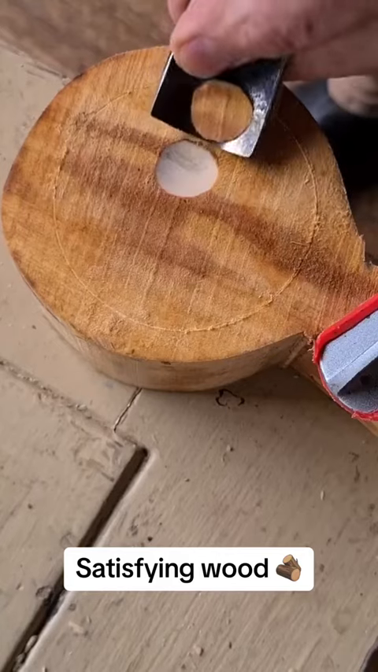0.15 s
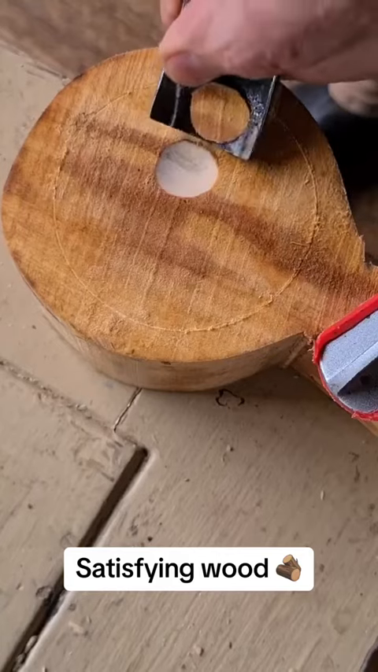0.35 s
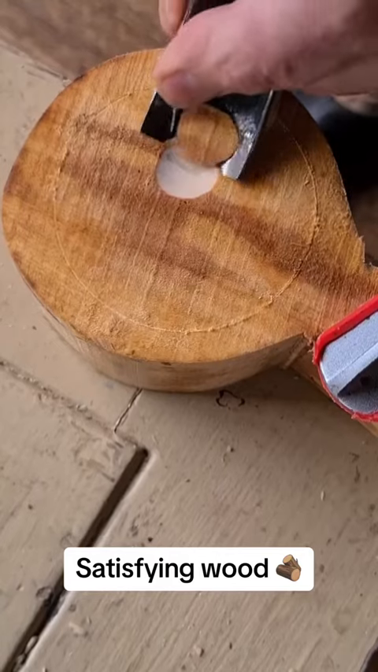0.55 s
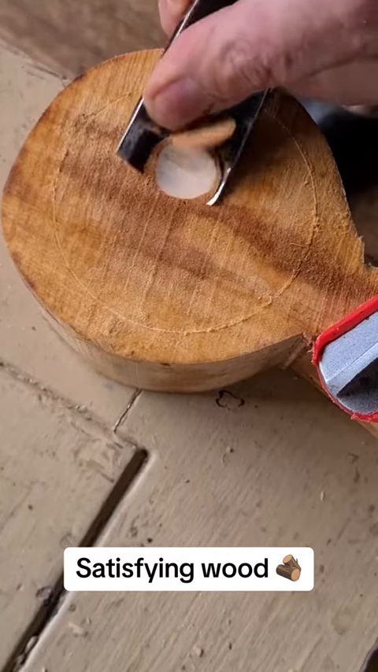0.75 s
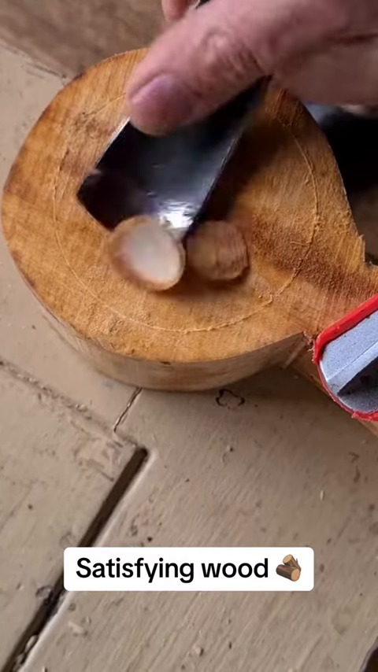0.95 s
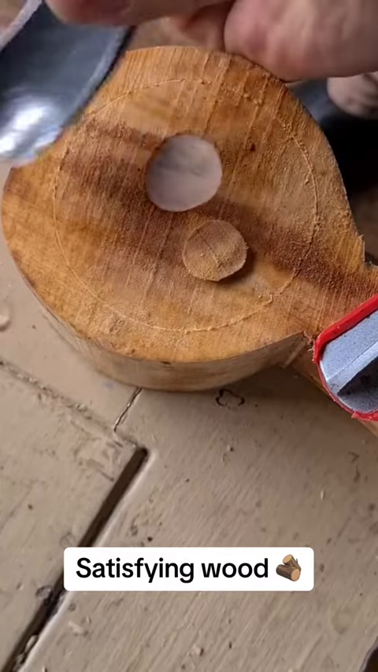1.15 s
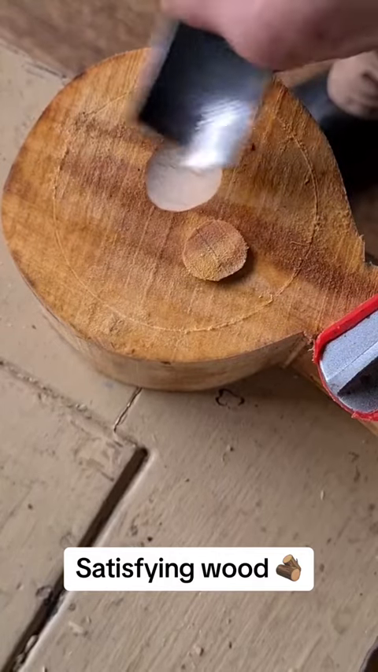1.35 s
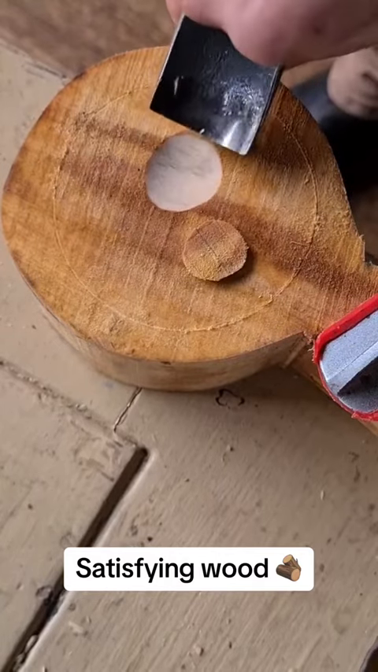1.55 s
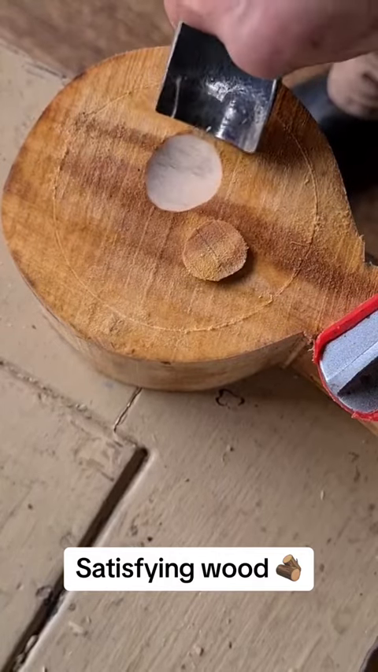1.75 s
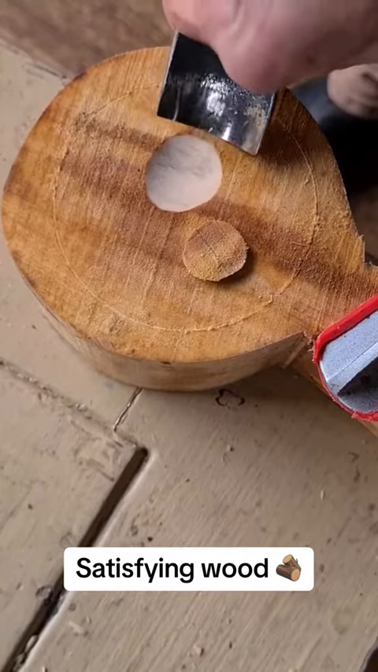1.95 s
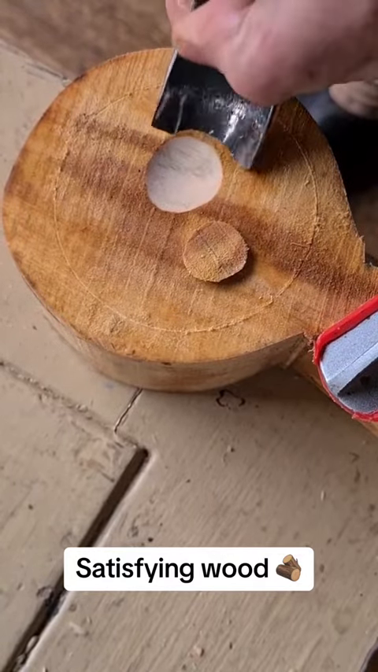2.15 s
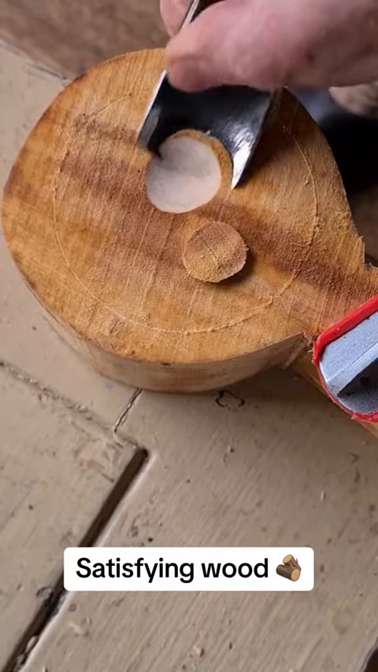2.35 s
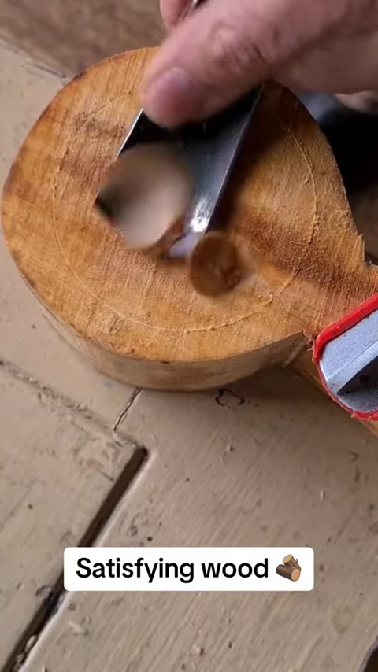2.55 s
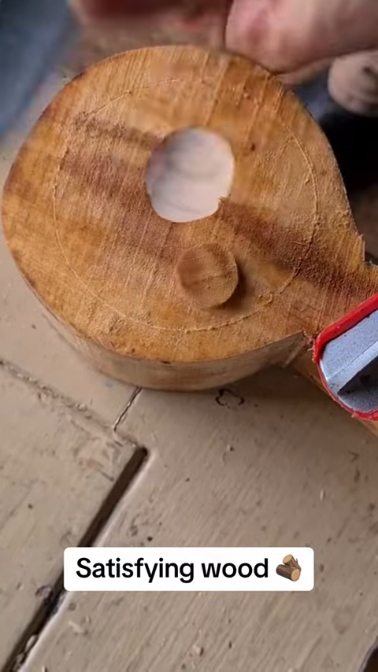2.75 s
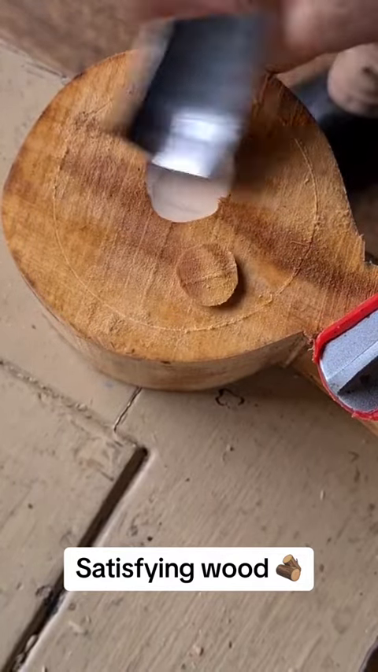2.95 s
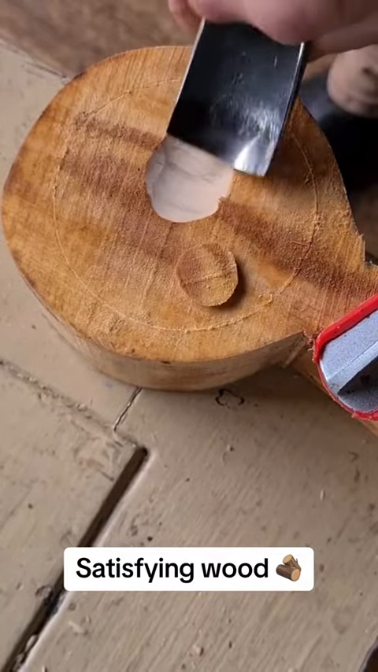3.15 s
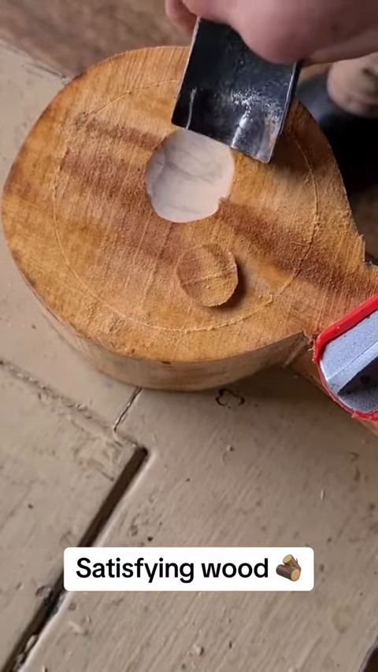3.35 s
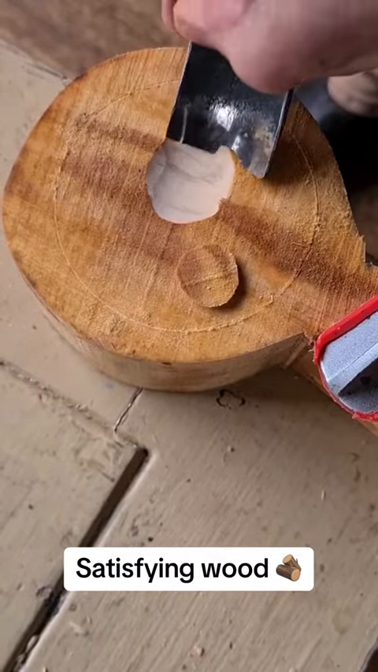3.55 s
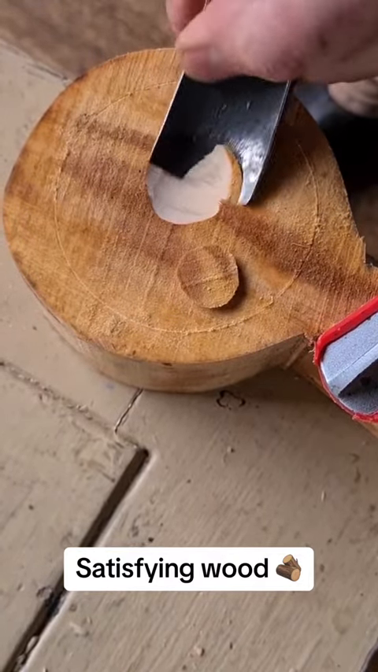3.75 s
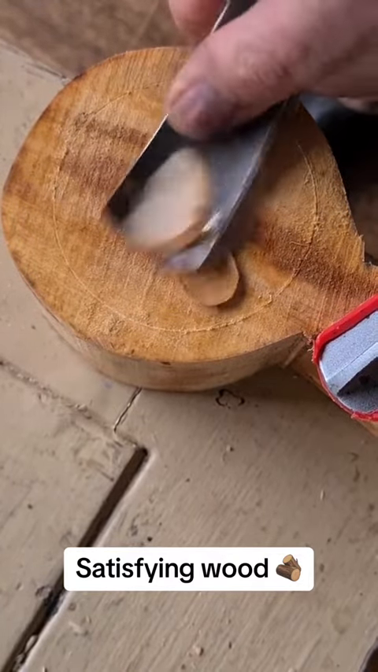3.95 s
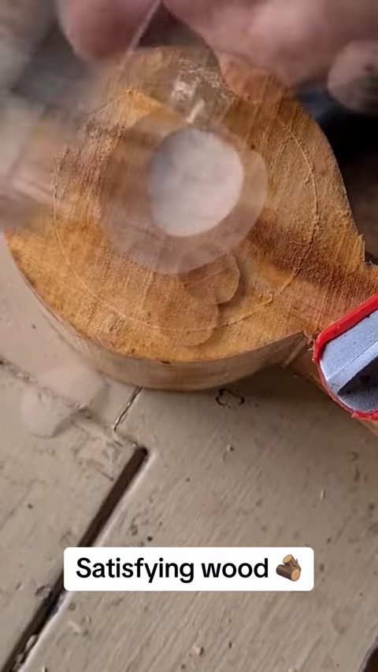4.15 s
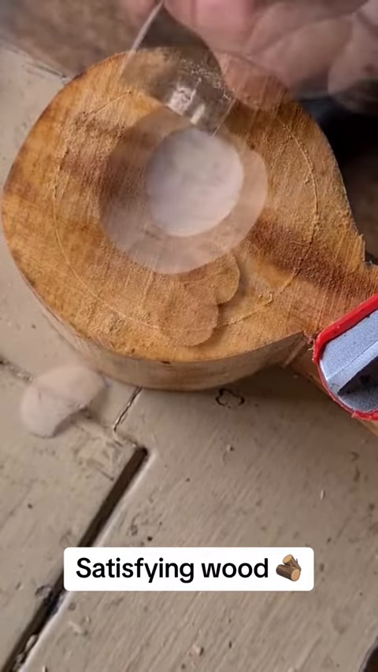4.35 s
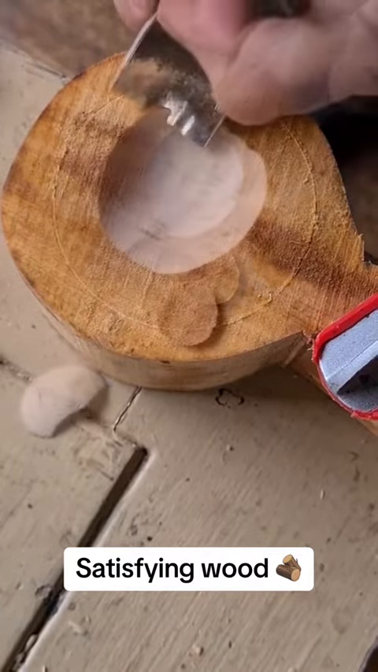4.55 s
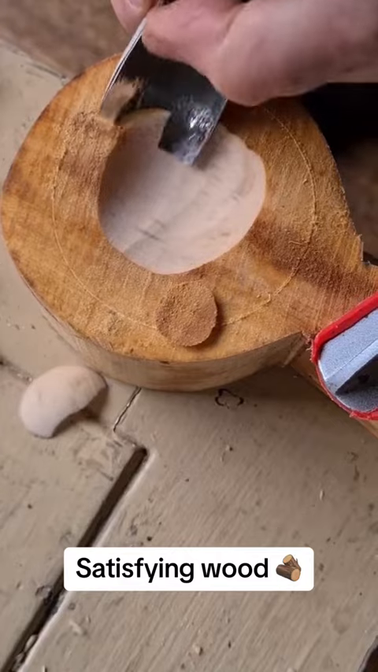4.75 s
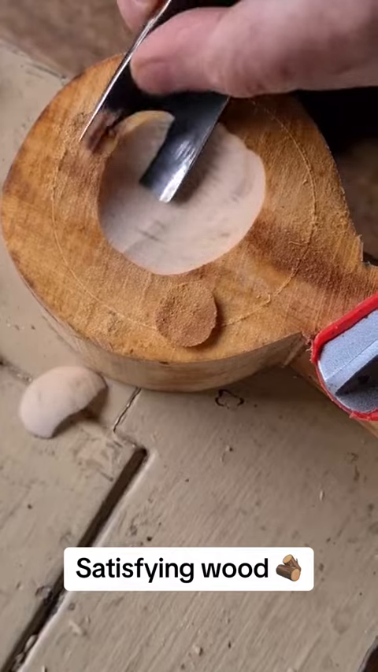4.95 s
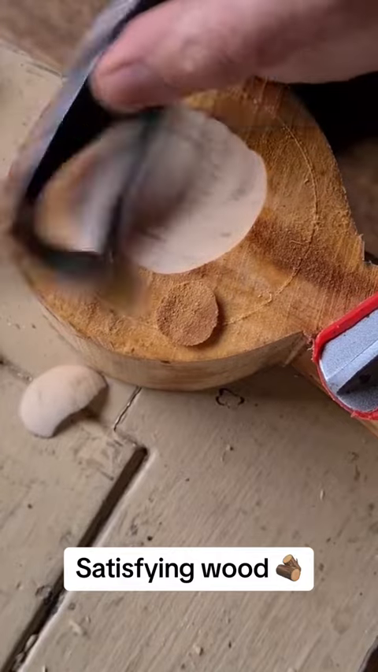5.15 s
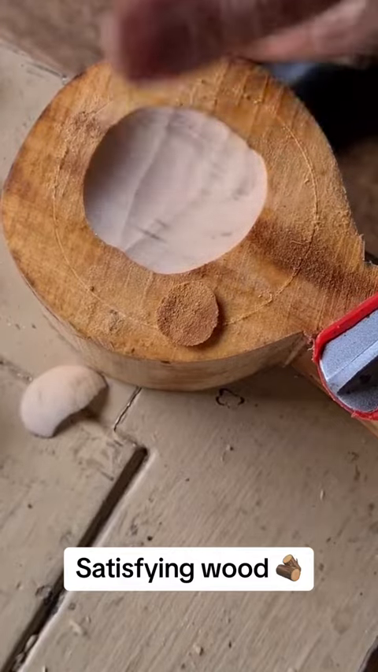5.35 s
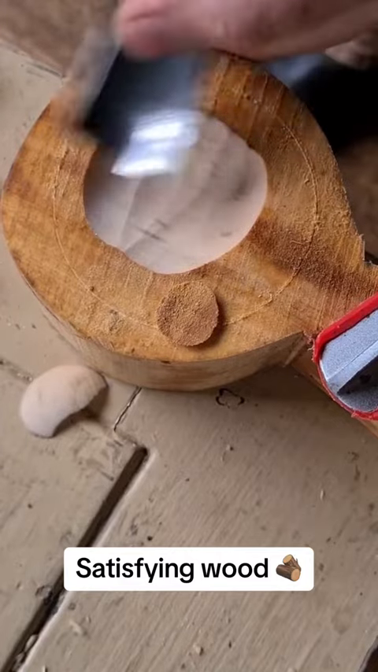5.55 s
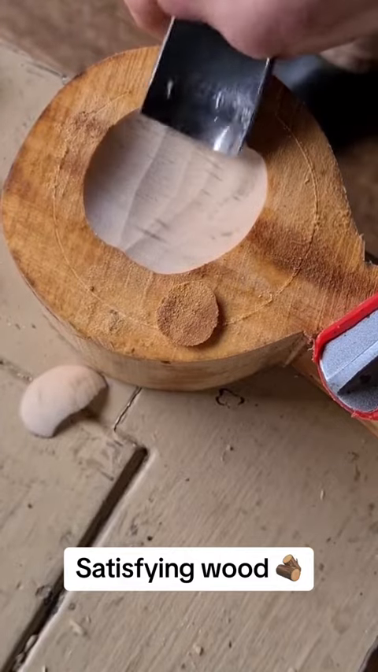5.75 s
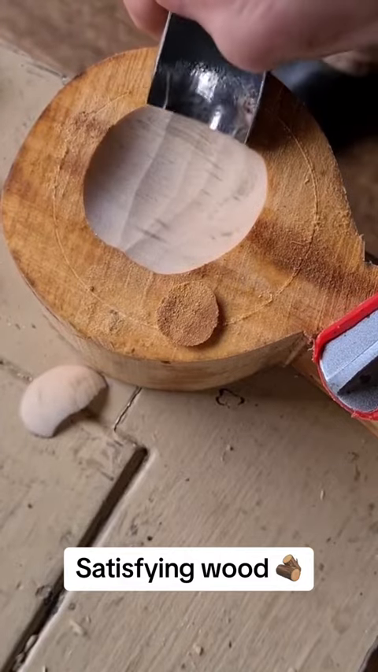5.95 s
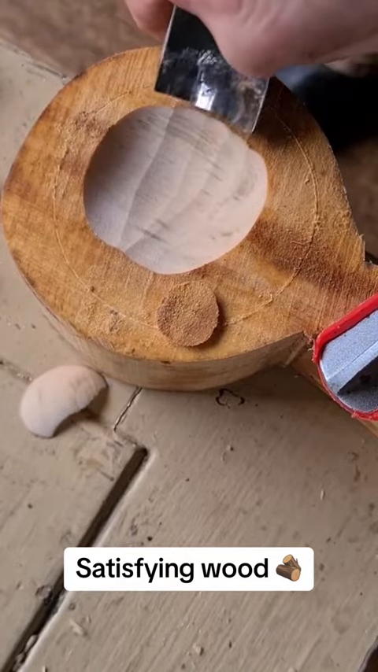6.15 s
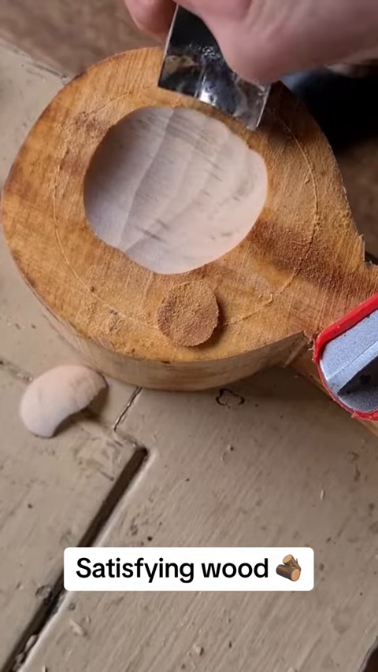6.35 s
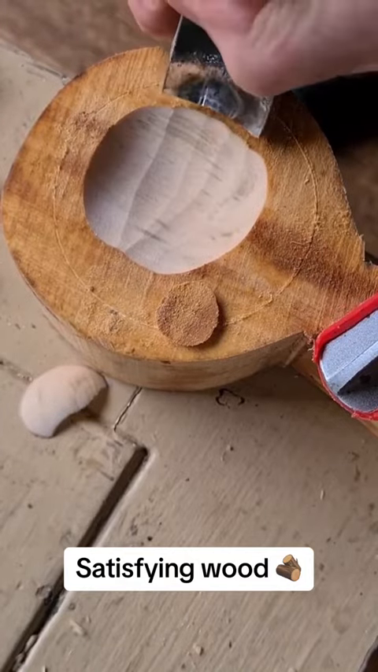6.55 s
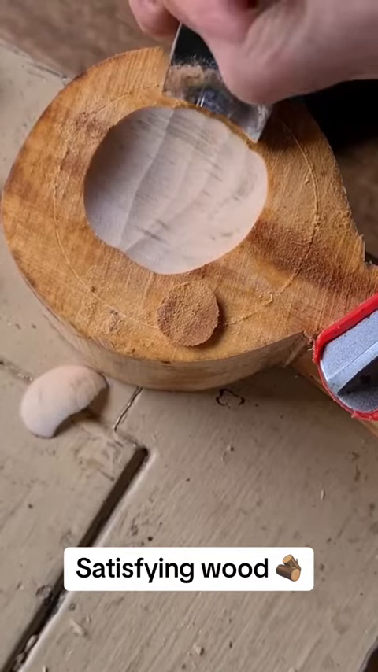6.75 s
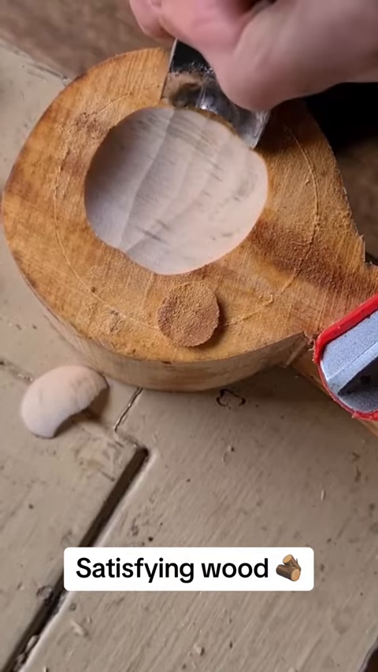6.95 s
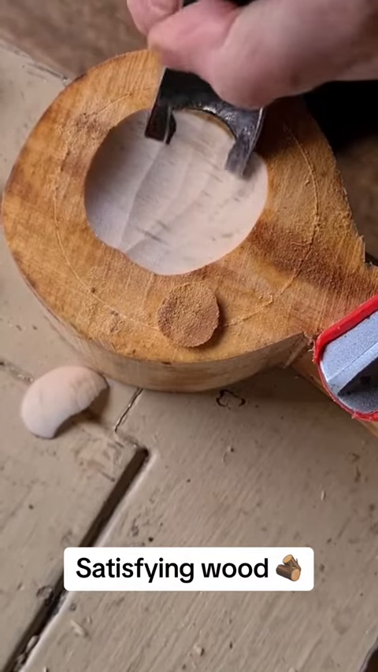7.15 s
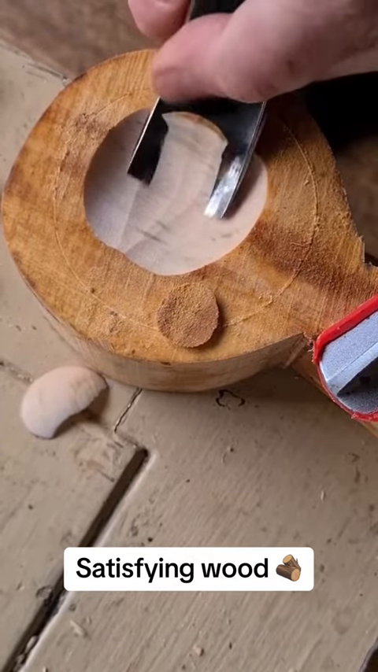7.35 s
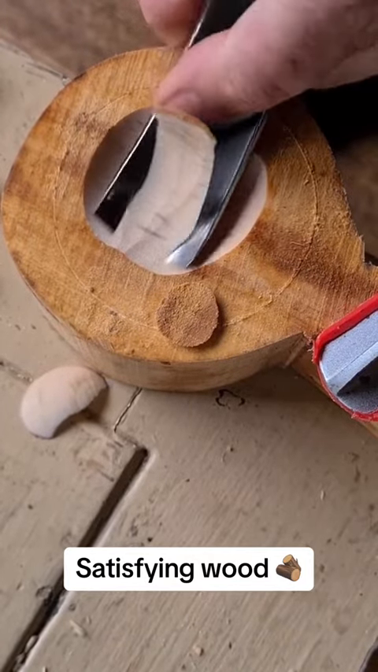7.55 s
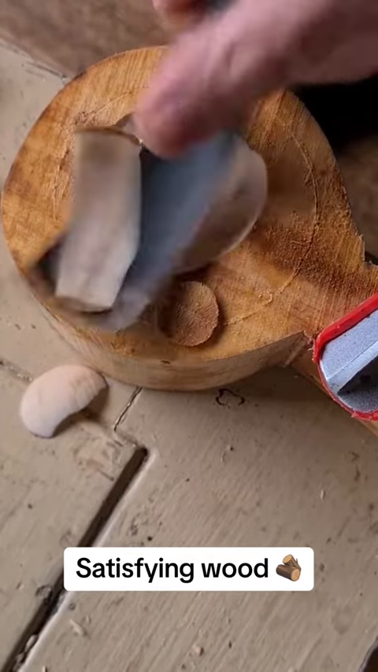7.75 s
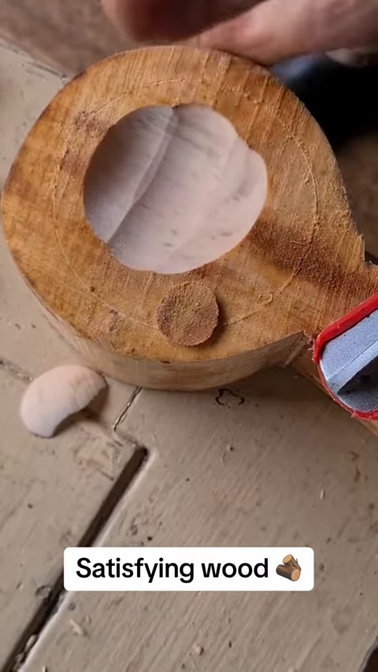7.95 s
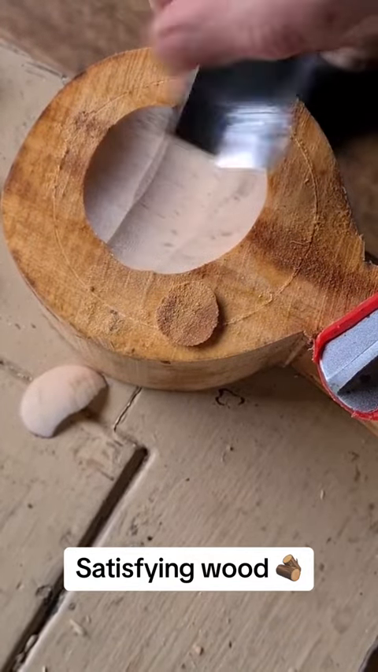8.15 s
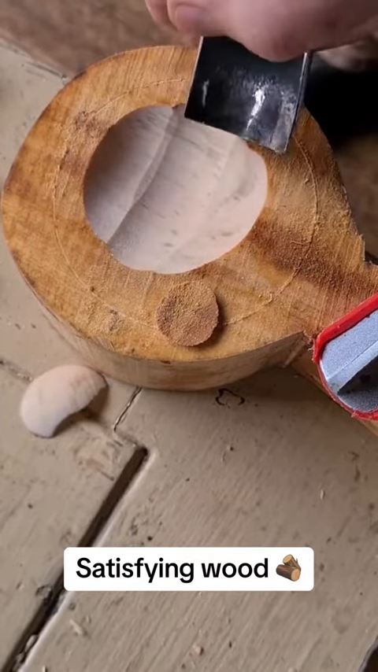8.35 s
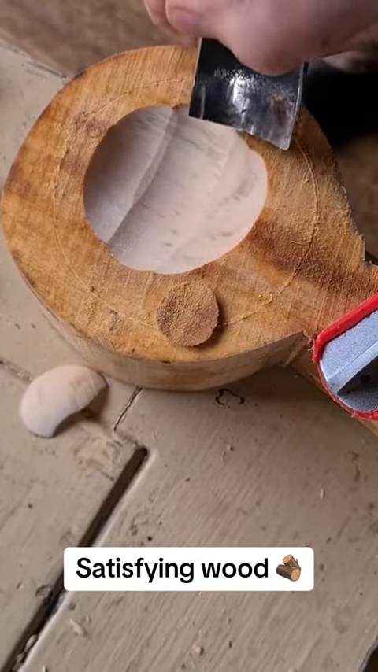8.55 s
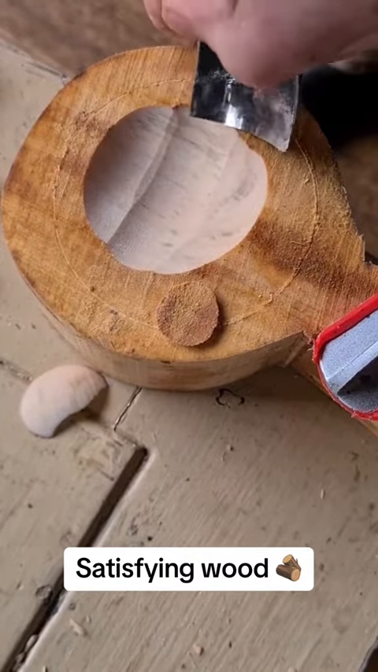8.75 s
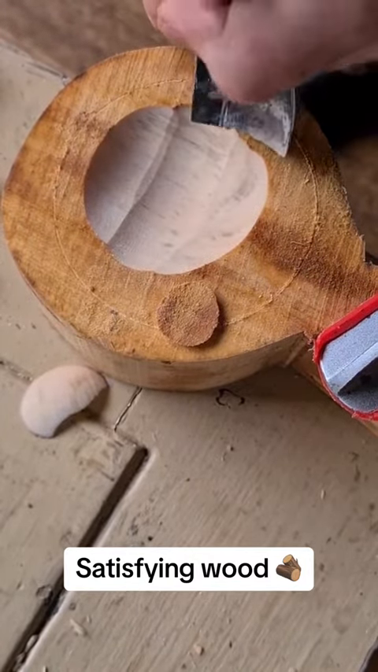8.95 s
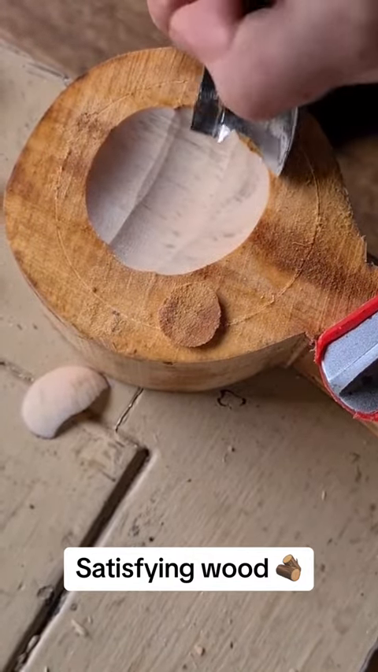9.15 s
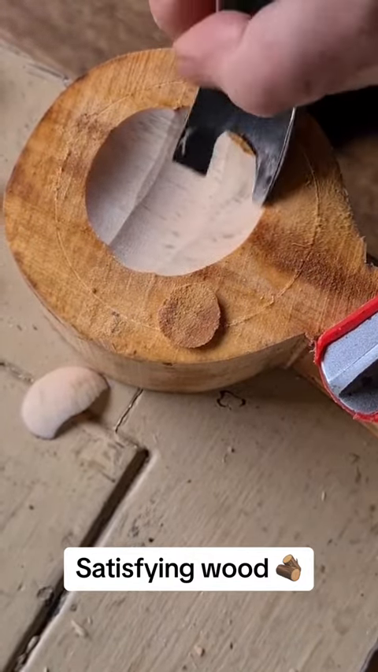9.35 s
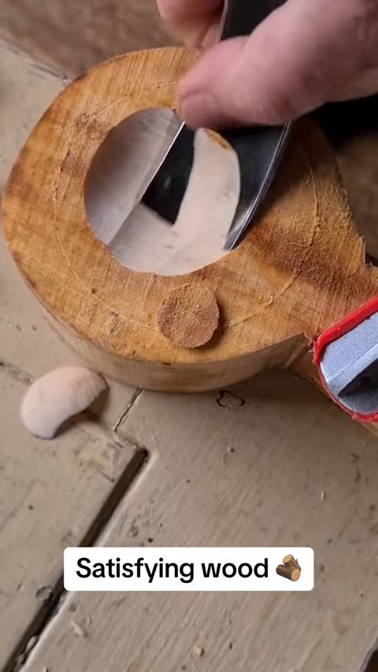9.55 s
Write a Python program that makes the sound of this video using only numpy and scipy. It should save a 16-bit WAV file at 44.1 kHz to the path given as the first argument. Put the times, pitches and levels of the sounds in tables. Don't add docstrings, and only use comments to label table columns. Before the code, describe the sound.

A hand gouge crunches through wood in six separate rasping pushes, with snapping fibres, sharp chip ticks and small bench knocks over faint hiss.

```python
import sys
import numpy as np
from scipy import signal
from scipy.fft import rfft, irfft
from scipy.io import wavfile
from scipy.ndimage import uniform_filter1d

SR = 44100
rng = np.random.default_rng(int(sys.argv[2]) if len(sys.argv) > 2 else 0)


def boost_factor(decibels):
    exponent = np.asarray(decibels, float) / 20
    return 10 ** exponent


def generate_wav(signal):
    frames = np.transpose(np.atleast_2d(signal))
    scaled = np.clip(frames, -1, 1) * 32767
    pcm = np.round(scaled).astype(np.int16)
    wavfile.write(sys.argv[1], SR, pcm)


N = 423801

# [f/Hz, level/dB]
AIR = [(15, -33.5), (25, -4), (71, 2), (128, -2), (318, -8), (879, -10), (1390, -7), (2240, -16),
       (3010, -12), (6040, -23), (8320, -33.5), (12400, -29.5), (15000, -37.5)]
# [f/Hz, likeness]
LIKENESS = [(60, 0.79), (240, 0.82), (950, 0.32), (3770, 0.12), (15000, 0.04)]
# [strongest t/s, rub level/dB, rustle level/dB, fade/(dB/s)]
HANDS = [(.1, -64.5, -64.5, 16), (.33, -73, -68, 60), (1.34, -69.5, -62.5, 29), (1.37, -65, -53, 197),
         (1.47, -73, -63, 110), (1.85, -78.5, -72, 15), (2.78, -90, -56.5, 299), (3.075, -67, -47, 250),
         (3.1, -70, -58.5, 42.5), (3.36, -77, -68, 90), (4.2, -85.5, -63, 43), (5.47, -72, -49, 300),
         (5.5, -61.5, -73, 200), (5.57, -83, -60.5, 46), (5.846, -49, -61, 200), (5.86, -65.5, -67.5, 13),
         (6.22, -67, -65.5, 49), (7.82, -65, -56, 195), (8.04, -64.5, -60, 51), (8.25, -60, -54.5, 80),
         (8.34, -66, -57, 202), (8.38, -72, -67, 42), (8.66, -68, -73, 5.5), (9.051, -75.5, -66.5, 39)]
# [f/Hz, width/Hz, level/dB]
SLEEVE = [(1148, 250, -2), (2230, 3400, -1.5), (3400, 1320, -2), (5500, 2420, -8.5), (7100, 2500, -10.5)]
# [t/s, peak level/dB, f/Hz, block level/dB]
KNOCKS = [(0.573, -39.5, 90, -35), (0.984, -29, 59.4, -1.5), (.985, -37, 540, -20), (1.057, -48, 171, -14),
          (1.963, -55.5, 95.5, -9), (2.115, -36, 92, -8), (2.41, -34.5, 80, -20), (2.698, -36.5, 248, -7.5),
          (2.779, -45, 101, -25), (3.442, -44, 177, -24.5), (3.478, -44.5, 101, -29),
          (3.774, -24, 79.3, -16), (4.089, -31, 165, -4.5), (5.24, -31, 152, 0), (5.293, -24.5, 142, 1.5),
          (5.31, -32, 199.4, -1.5), (5.329, -31.5, 191, -23), (5.402, -36, 234, -9), (5.846, -35.5, 100, 1),
          (5.845, -49, 1300, -30), (5.845, -55, 2600, -30), (5.896, -49, 166, -10),
          (6.161, -49.5, 285, -12), (7.005, -36.5, 73, -11.5), (7.087, -29.5, 66, -8.5),
          (7.17, -30, 75.4, -22), (7.218, -27.5, 79, -26), (7.245, -29.5, 83, -21), (7.739, -29.5, 107, -4),
          (8.033, -48.5, 364, -3), (8.234, -37, 666, -13), (8.664, -48, 405, -16.5),
          (8.886, -47.5, 81.5, -16), (9.15, -45, 80, -22), (9.201, -36, 78, -19), (9.261, -32, 79.4, -25)]
# [f/Hz, width/Hz, level/dB]
BENCH = [(51.7, 15, -5.5), (79.4, 13, 3.5), (108, 23, -2), (153.5, 25, 2.5), (220, 75, -4)]
# [f/Hz, width/Hz, level/dB]
BLOCK = [(303.6, 64.5, 3.5), (407.8, 26, -2), (476.7, 112, 0), (727, 60, 1), (910, 554, 0.5),
         (1284, 384, 1.5), (1876, 150, -5), (2310, 560, -7), (2760, 400, -14)]
# [f/Hz, width/Hz, level/dB]
BLADE = [(3195, 700, -2.5), (3844, 700, -4), (4645, 260, -5.5), (5570, 1200, -2.5), (6320, 520, -2.5),
         (6813, 250, -4), (7750, 530, -11.5)]
# [f/Hz, width/Hz, level/dB]
EDGE = [(8650, 1100, 1), (9400, 900, -18), (10600, 3900, 13), (12100, 520, 9), (13400, 520, -7),
        (14360, 1900, -6)]
# [t/s, tearing level/dB]
PUSHES = [
    [(0.575, -64), (0.58, -45), (0.608, -49), (0.7, -42), (0.712, -37.5), (0.76, -41.5), (0.86, -38.5),
     (0.965, -33), (0.99, -46)],
    [(2.112, -65), (2.12, -48), (2.166, -56), (2.28, -46.5), (2.422, -46), (2.486, -36.5), (2.584, -35.5),
     (2.66, -36), (2.7, -45)],
    [(3.772, -47), (3.778, -34), (3.792, -39.5), (3.978, -35.5), (4.036, -29.5), (4.07, -31), (4.09, -47.5)],
    [(4.6, -62.5), (4.63, -48), (4.8, -37.5), (4.88, -42), (4.96, -32), (5.03, -37.5), (5.088, -29),
     (5.198, -27), (5.24, -43)],
    [(7.186, -49), (7.22, -43), (7.314, -43), (7.354, -31), (7.43, -36.5), (7.48, -36), (7.56, -32),
     (7.718, -28.5), (7.74, -47)],
    [(9.0, -74), (9.234, -47), (9.254, -38.5), (9.34, -41), (9.396, -32.5), (9.444, -38.5), (9.534, -31),
     (9.592, -36), (9.61, -38.5)],
]
# [t/s, tearing level/dB]
FEELS = [
    [(3.612, -64.5), (3.622, -51.5), (3.656, -44), (3.726, -45), (3.76, -58.5), (3.765, -56)],
    [(6.82, -68), (6.838, -56), (6.86, -59), (6.9, -56), (6.994, -62.5), (7.008, -46), (7.042, -57),
     (7.075, -57), (7.1, -62), (7.113, -64.5)],
    [(7.114, -58), (7.124, -41), (7.135, -34), (7.152, -27), (7.166, -33), (7.186, -46.5)],
]
# [half sunk t/s, depth 0-1, bench level/dB, blade level/dB, edge level/dB]
SINKS = [(.9, .7, -0.5, 0, 3.5), (2.601, 1.1, -1, 0, 1.5), (4.0, .9, -3, -1, 0.5), (5.11, .7, 0, -3, -3.5),
         (7.49, .9, 2.5, 0.5, 0), (9.57, .7, -1.5, 0, -1.5), (3.9, .1, -3, -0.5, -5), (7.2, .1, -2, -3, -6),
         (7.3, .1, 0, 1.5, -1.5)]
# (t/s, half length/s, level/dB)
SPLIT = (3.1, .012, 9.8)
# [from t/s, to t/s, f/Hz, level/dB]
ACCENTS = [(0.617, 0.784, 3700, 6.5), (0.576, 0.72, 1970, 6), (0.905, .99, 2720, -1), (.9, .99, 4100, -4.5),
           (2.13, 2.45, 2320, -0.5), (2.5, 2.7, 6650, 4), (2.504, 2.7, 11400, 5.5), (2.64, 2.72, 2740, -7),
           (3.62, 3.76, 6200, 3), (3.8, 4.0, 790, -0.5), (3.953, 4.09, 4430, -5.5), (4.62, 4.896, 1900, 3),
           (4.62, 4.9, 2420, -1.5), (4.7, 5.05, 3400, 3), (4.66, 4.9, 5000, -3), (5.03, 5.2, 2830, -6.5),
           (5.03, 5.233, 6130, 2.5), (5.05, 5.17, 4420, -18), (5.047, 5.23, 3250, 4), (5.052, 5.224, 2340, 3),
           (5.054, 5.23, 1610, -2), (5.06, 5.162, 8340, -3), (6.87, 7.0, 3700, 3), (7.0, 7.18, 2120, 5),
           (7.13, 7.159, 3650, 5), (7.12, 7.43, 1840, 3), (7.2, 7.444, 3500, -1), (7.486, 7.724, 4880, 6),
           (7.486, 7.724, 5500, 3), (7.48, 7.73, 1560, 5), (7.5, 7.725, 1070, -2), (7.49, 7.73, 3740, 2),
           (7.528, 7.618, 4100, -3), (7.55, 7.7, 8700, -10), (7.556, 7.73, 2730, -4.5),
           (9.1, 9.35, 2070, 7.5), (9.236, 9.61, 1450, 2.5), (5.12, 5.24, 560, 2), (4.9, 5.1, 560, -3),
           (3.95, 4.09, 1100, 3), (2.45, 2.7, 8500, -5)]
# [t/s, peak level/dB, dull level/dB, left-right level/dB]
SNAPS = [(0.754, -38, -10, -2), (2.2294, -48, 2, -3), (2.3773, -44, -5, -4), (3.6375, -44, -11, -3),
         (3.7853, -37, -6, -3), (3.7912, -34, -11, -5), (3.849, -34, -11, -4), (4.7528, -38, -7, -1),
         (7.1466, -22, -11, -4), (7.2974, -40, -4, -4), (7.639, -22, -18, -5), (9.1361, -54, -9, -1),
         (9.284, -34, -15, -3)]
# [t/s, peak level/dB, dull level/dB, left-right level/dB]
POPS = [(.947, -24, 36, -2), (.958, -26, 36, -2), (.974, -25, 36, -2), (4.032, -21, 36, -2),
        (4.058, -21, 36, -2.5), (5.142, -17, 36, -2), (5.163, -22, 36, -1), (5.1895, -19, 36, -2),
        (9.401, -27, 36, -2), (9.523, -25, 36, -2), (9.573, -25, 36, -2)]
# [t/s, peak level/dB, dull level/dB, left-right level/dB]
CHIPS = [(1.072, -30.5, -22, -5), (1.351, -27, 4.5, -2), (1.435, -26, -13, -8), (2.119, -47, -4, -2),
         (2.629, -28, -22, 5), (2.6345, -15, -25, 2), (2.6372, -4.5, -35, -1), (2.6555, -21.5, -17, -8.5),
         (3.0595, -12.5, -11, -2), (3.062, -14.5, -1.5, 4), (3.065, -25, 2, -4), (5.449, -29, 4, -5),
         (5.452, -28, 0, -2), (5.456, -28, -5, 5), (5.461, -25, -3, -2), (5.639, -39.5, -4, -12),
         (7.9345, -36.5, 12, -4)]
# [t/s, peak level/dB, dull level/dB, left-right level/dB]
TAPS = [(1.352, -36, -17, -6), (1.443, -41, 7, -4), (3.192, -28.5, 16.5, -3), (3.317, -47.5, 29, -3.5),
        (3.386, -47, 12, -2), (5.442, -35.5, 14, -4), (5.459, -24, -5, 1), (5.57, -43, 13, -3),
        (5.576, -34, 6, -7), (5.596, -52, 5, -3), (5.669, -50, 5, -3), (5.727, -41.5, 8, -8.5),
        (5.843, -43, 29.5, 0), (6.838, -49, 3, -2), (7.006, -39.5, 6, -2), (7.009, -43, 3, -1),
        (7.071, -38.5, 13, 3), (7.087, -34, 0, -2), (7.089, -34.5, 14, -1), (7.092, -44, 4, -1),
        (7.6665, -11, -17, -4), (7.87, -35, -33, -5), (8.234, -22, 28, 0), (8.235, -24, -5.5, -6),
        (8.246, -23.5, 20, -3), (8.2465, -27, -5.5, -5), (8.339, -45, -1, -3)]
# [t/s, peak level/dB, f/Hz, cycles to fade 20 dB]
THUMPS = [(3.779, -26, 95, 4), (5.186, -25, 150, 12), (5.855, -39, 110, 3), (5.889, -44, 200, 6),
          (5.995, -57, 430, 14), (5.2445, -24, 150, 6), (5.291, -25, 280, 2.5), (5.298, -17, 250, 3),
          (5.3045, -21, 230, 4), (5.3155, -22, 165, 6), (5.331, -25, 200, 4), (5.362, -32, 190, 7),
          (5.3965, -27, 230, 4), (5.843, -21, 230, 1.6)]
# [t/s, scrape/s, f/Hz, t60/s, level/dB]
STEEL = [
    (4.0, .09, 7062, .3, -50),
    (3.97, .1, 12576, .5, -56),
    (8.23, .02, 12576, .5, -78),
]
# [delay t/s, left level/dB, right level/dB]
NEAR = [(.00035, -24.5, -31), (.0009, -16.5, -14.5), (.0017, -11.5, -15), (.0031, -21.5, -11)]
# [f/Hz, t60/s]
DECAY = [(100, 0.62), (400, 0.39), (1500, 0.22), (5000, 0.23), (12000, 0.24)]
# [f/Hz, level/dB]
WET = [(100, -24), (500, -10.5), (2000, -4.5), (8000, -5.5)]
# [from t/s, to t/s, upper limit f/Hz]
TOPS = [(.86, .915, 16000), (.925, 1.005, 14700), (1.43, 1.445, 16400), (1.445, 1.47, 14600),
        (2.48, 2.75, 14500), (2.5, 2.59, 16200), (2.62, 2.68, 16500), (3.055, 3.1, 16300),
        (3.83, 3.9, 14400), (3.845, 3.885, 15700), (3.93, 3.98, 15300), (4.03, 4.1, 14500),
        (4.92, 4.995, 14500), (5.05, 5.26, 13800), (5.125, 5.16, 16200), (5.165, 5.235, 14700),
        (5.45, 5.475, 14500), (7.12, 7.16, 15000), (7.31, 7.34, 14300), (7.34, 7.39, 14900),
        (7.545, 7.575, 16000), (7.52, 7.66, 14700), (7.705, 7.76, 14700), (9.36, 9.47, 14500),
        (9.51, 9.58, 14700), (9.58, 9.61, 13700)]
# [from t/s, to t/s, f/Hz]
GAPS = [(3.78, 3.81, 5200), (3.9, 4.15, 2600), (4.62, 4.7, 4800), (4.71, 4.9, 4950), (4.72, 4.9, 10500),
        (5.07, 5.15, 2850), (5.07, 5.15, 4400), (5.06, 5.165, 8400), (5.07, 5.14, 10000),
        (7.19, 7.28, 5250), (7.17, 7.3, 10500), (7.25, 7.29, 4050), (7.41, 7.5, 2500), (7.5, 7.6, 2650),
        (7.6, 7.72, 2780), (7.53, 7.61, 4120), (7.68, 7.72, 4450), (7.55, 7.69, 8300), (7.53, 7.61, 9700),
        (9.25, 9.36, 5100), (9.24, 9.33, 10800), (9.45, 9.5, 9000)]
# (from t/s, to t/s, level/dB)
LEAN = (8.2, 8.42, -12)


def evened(x):
    return x / np.sqrt(np.mean(x ** 2) + 1e-20)


def read(points, hz):
    f, value = np.transpose(points)
    return np.interp(np.log(hz + 1), np.log(f + 1), value)


def add(mix, s, sound):
    part = mix[..., round(s * SR):][..., :sound.shape[-1]]
    part += sound[..., :part.shape[-1]]


def ring(x, hz, width):
    r = np.exp(-np.pi * width / SR)
    return 2 * signal.lfilter([1 - r], [1, -r * np.exp(2j * np.pi * hz / SR)], x).real


def resonate(x, hz, width):
    return ring(ring(x, hz, width), hz, width)


def body(x, modes, lean_db=lambda hz: 0):
    total, power = 0, 0
    for k, (hz, width, db) in enumerate(modes):
        gain = boost_factor(db + lean_db(hz))
        total = total + (-1) ** k * gain * evened(resonate(x, hz, 1.723 * width))
        power = power + gain ** 2
    return total / np.sqrt(power)


def fibres(per_s, spread_db):
    size = boost_factor(spread_db * np.minimum(rng.exponential(1, N), 4)) * rng.choice([-1., 1.], N)
    return evened(size * (rng.random(N) < per_s / SR))


def air():
    frames, hz = N // 256 + 5, np.fft.rfftfreq(1024, 1 / SR)
    a, b, c, d, patches = rng.standard_normal((frames, 513, 5)).T
    patches = evened(uniform_filter1d(uniform_filter1d(patches, 10, axis=0), 14, axis=1))
    same = np.clip(read(LIKENESS, hz), -1, 1)[:, None]
    left = a + 1j * b
    right = same * left + np.sqrt(1 - same ** 2) * (c + 1j * d)
    z = np.array([left, right]) * boost_factor(read(AIR, hz)[:, None] + 2 * patches)
    return boost_factor(-71) * evened(signal.istft(z, nperseg=1024, noverlap=768)[1][:, :N])


def hands():
    t = np.arange(0, N, 64) / SR
    s, rub_db, rustle_db, fade = np.transpose(HANDS)[..., None]
    away_db = fade * np.maximum(t - s, 2.4 * (s - t))
    rub, rustle = (np.repeat(boost_factor(db - away_db).max(axis=0), 64)[:N] for db in (rub_db, rustle_db))
    grains = fibres(3000, 2.1)
    return rub * body(grains, BLOCK[:3]) + rustle * body(grains, SLEEVE)


def knocks():
    out, t = np.zeros(N), np.arange(SR // 2) / SR
    rattle_t60 = 0.21
    rattles = rng.standard_normal((len(KNOCKS), len(t)))
    for (s, db, hz, wood_db), rattle in zip(KNOCKS, rattles):
        push = (t < .0012) * 0.48 + rattle * boost_factor(-60 * t / rattle_t60)
        thud = evened(resonate(push, hz, 0.41 * hz))
        thud += boost_factor(wood_db) * body(push, BENCH[3:] + BLOCK[:3])
        thud += boost_factor(wood_db - 17.0) * evened(resonate(push, 800, 900))
        add(out, s, boost_factor(db) * thud / abs(thud).max())
    return out


def controls():
    out, t = np.zeros((6, N)), np.arange(N) / SR
    out[0] = -120
    sink_s, bite_s = 0.018, 0.013
    for rows, (sunk, depth, *shares_db) in zip(PUSHES + FEELS, SINKS):
        s, db = np.transpose(rows)
        on = (t >= s[0]) & (t <= s[-1])
        u = t[on]
        out[0, on] = np.interp(u, s, db)
        out[1, on] = depth / (1 + np.exp((sunk - u) / sink_s))
        out[2, on] = np.exp((s[0] - u) / bite_s)
        out[3:, on] = np.array(shares_db)[:, None]
    return out


def patchy(x, patchy_db):
    hz, t, z = signal.stft(x, SR, nperseg=512)
    patches = rng.standard_normal((len(t), len(hz))).T
    patches = evened(uniform_filter1d(uniform_filter1d(patches, 3, axis=0), 16, axis=1))
    start, end, mode_hz, db = np.transpose(ACCENTS)[..., None]
    fade_s, wide_hz = .012, 220
    held = np.clip(np.minimum(t - start, end - t) / fade_s + .5, 0, 1)
    accent_db = (db * np.exp(-.5 * ((hz - mode_hz) / wide_hz) ** 2)).T @ held
    shade_db = patchy_db * patches * (hz > 600)[:, None]
    return signal.istft(z * boost_factor(shade_db + accent_db), SR, nperseg=512)[1][:N]


def gouge():
    effort_db, depth, bite, bench_db, blade_db, edge_db = controls()
    tearing = uniform_filter1d(boost_factor(effort_db), 130)
    over_db = np.maximum(effort_db + 40, -30)
    split_s, split_half_s, split_peak_db = SPLIT
    split_db = split_peak_db * np.exp(-((np.arange(N) / SR - split_s) / split_half_s) ** 2)
    shake = boost_factor(-4 + bench_db - 0.41 * over_db + 2.5 * depth)
    hiss = boost_factor(-8 + blade_db + 3.5 * depth + 6.5 * bite + split_db)
    fizz = boost_factor(-24 + edge_db + 0.39 * over_db + 6.5 * depth - 5 * bite + split_db)
    slips = boost_factor(.7 * evened(uniform_filter1d(rng.standard_normal(N), 500)))
    coarse = fibres(3000, 3) * slips
    fine = fibres(6000, 2.4) * slips
    shallow_hz, deep_hz, bite_hz = 3750, 5454, 885
    blade_hz = shallow_hz + (deep_hz - shallow_hz) * depth + bite_hz * bite
    blade = body(fine, BLADE, lambda hz: -(12 + 10 * depth) * abs(np.log2(hz / blade_hz)))
    drive = tearing * shake
    low = body(drive * coarse, BENCH) * np.sqrt(np.mean(drive ** 2))
    high = body(coarse, BLOCK) + hiss * blade + fizz * body(fine, EDGE)
    return low + tearing * patchy(high, 2.9)


def chips(rows, bright_db):
    out, t, f = np.zeros((2, N)), np.arange(2048) / SR - .004, np.fft.rfftfreq(2048, 1 / SR) + 1
    thin_hz, thick_hz, thick_db = 6136, 3500, -2
    cracks = rng.standard_normal((len(rows), len(t)))
    for (s, db, dull_db, pan_db), crack in zip(rows, cracks):
        hz = thick_hz + (thin_hz - thick_hz) / (1 + boost_factor(4.3 * (dull_db - thick_db)))
        snap = np.clip(db + 45, 3, 25) * (abs(t) < .5 / SR)
        envelope = np.where(t < 0, np.exp(t / .0008), np.exp(-t / .0017))
        crack = (crack ** 3 + snap) * envelope
        # level/dB, f/Hz, width/octaves
        parts = ((0, hz, .25), (dull_db, 1100, .8), (bright_db, 12200, .35), (-4, 3200, .45),
                 (0.53 * bright_db - 4.0, 7200, .25), (dull_db - 13, 480, .6))
        colour = 0
        for g_db, at_hz, wide in parts:
            band = np.exp(-.5 * (np.log2(f / at_hz) / wide) ** 2)
            colour = colour + boost_factor(g_db) * band / np.sqrt(at_hz * wide)
        tick = irfft(rfft(crack) * colour)
        add(out, s - .0035, boost_factor(db) * tick / abs(tick).max() * boost_factor([[pan_db / 2], [-pan_db / 2]]))
    return out


def thumps():
    out, t = np.zeros(N), np.arange(SR // 8) / SR
    for s, db, hz, cycles in THUMPS:
        rise = np.minimum(t * hz / .7, 1)
        add(out, s, -boost_factor(db - 20 * t * hz / cycles) * rise * np.sin(2 * np.pi * hz * t))
    return out


def steel():
    out, t = np.zeros(N), np.arange(SR // 2) / SR
    for s, scrape, hz, t60, db in STEEL:
        sing = ring(rng.standard_normal(len(t)) * (t < scrape), hz, 2.2 / t60)
        add(out, s, boost_factor(db) * sing / abs(sing).max())
    return out


def bench_top(x):
    out = np.array([x, x])
    for s, left_db, right_db in NEAR:
        add(out, s, x * boost_factor([[left_db], [right_db]]) * [[1], [-1]])
    return out


def scatter(x):
    t = np.arange(600) / SR
    taps = rng.standard_normal((2, len(t))) ** 3 * np.exp(-t / .004) * (t > .0003)
    taps = taps / np.linalg.norm(taps, axis=1, keepdims=True)
    taps = signal.lfilter(*signal.butter(1, 3000, "high", fs=SR), taps)
    return boost_factor(-3.5) * signal.oaconvolve(x[None], taps, axes=1)[:, :N]


def shop(x):
    taps = np.zeros((2, SR))
    at = np.arange(400, SR - 20, 20)[:, None] + rng.integers(0, 20, ((SR - 401) // 20, 2))
    np.put_along_axis(taps, at.T, rng.choice([-1., 1.], at.T.shape), axis=1)
    hz, t, z = signal.stft(taps, SR, nperseg=512)
    z = z * boost_factor(-60 * t / read(DECAY, hz)[:, None])
    z = z / np.sqrt((abs(z) ** 2).sum(axis=2, keepdims=True)) * boost_factor(read(WET, hz))[:, None]
    tail = signal.istft(z, SR, nperseg=512)[1]
    tail *= boost_factor(WET[-1][1]) / np.linalg.norm(tail[0])
    return signal.fftconvolve(x[None], tail, axes=1)[:, :N]


def scene():
    work = gouge() + steel() + knocks() + thumps() + hands()
    ticks = chips(CHIPS, -6.5) + chips(SNAPS, -17) + chips(TAPS + POPS, -26)
    bass = ring(work, 0.32, 670) / 2
    near = (bass + bench_top(work - bass)) * boost_factor([[-1.6], [.6]])
    tick_mid = ticks.mean(axis=0)
    return near + ticks + scatter(work + tick_mid) + shop(work + boost_factor(-0.5) * tick_mid) + air()


def band_limit(x):
    return signal.sosfilt(signal.butter(12, 16650, fs=SR, output="sos"), x)


def record(dry):
    hz, t, z = signal.stft(dry, SR, nperseg=1024)
    power = uniform_filter1d((abs(z) ** 2).mean(axis=0), 6, axis=1)
    band_db = 10 * np.log10(uniform_filter1d(power, 4, axis=0) + 1e-20)
    around_db = uniform_filter1d(band_db, 40, axis=0)
    wander_db = 1.5 * np.repeat(rng.standard_normal(len(t) // 3 + 1), 3)[:len(t)]
    keep = np.where((hz > 1900)[:, None], band_db > around_db - 4.6 + wander_db, 1.)

    start, end, top_hz = np.transpose(TOPS)[..., None]
    limit_hz = np.maximum((top_hz * (t > start) * (t < end)).max(axis=0), 13200)
    keep *= hz[:, None] < limit_hz
    for start, end, gap_hz in GAPS:
        notch_db = -16 * np.exp(-.5 * ((hz - gap_hz) / 110) ** 2)
        keep[:, (t > start) & (t < end)] *= boost_factor(notch_db)[:, None]

    weak, under = (hz > 8300) & (hz < 10200), (hz > 5500) & (hz < 8000)
    weak_db, under_db = band_db[weak].mean(axis=0), band_db[under].mean(axis=0)
    keep[weak] *= np.clip((weak_db - under_db + 18 + np.maximum(under_db + 69, 0)) / 2, .25, 1)
    keep[np.ix_(weak, (t > LEAN[0]) & (t < LEAN[1]))] *= boost_factor(LEAN[2])

    now_db = 10 * np.log10((abs(z[:, hz > 2000]) ** 2).sum(axis=(0, 1)) + 1e-20)
    click = now_db - signal.medfilt(now_db, kernel_size=11) > 8
    beside = (np.convolve(click, np.ones(9))[2:len(t) + 2] > 0) & ~click
    blocks = np.kron(rng.random((len(t) // 2 + 1, 52)).T, np.ones((10, 2)))[:len(hz), :len(t)]
    keep[(blocks < .18) & beside & (hz > 2000)[:, None]] *= .05
    mix = signal.istft(z * keep, SR, nperseg=1024)[1][:, :N]
    return band_limit(mix)


dry = scene()
out = record(dry)
generate_wav(out)
```